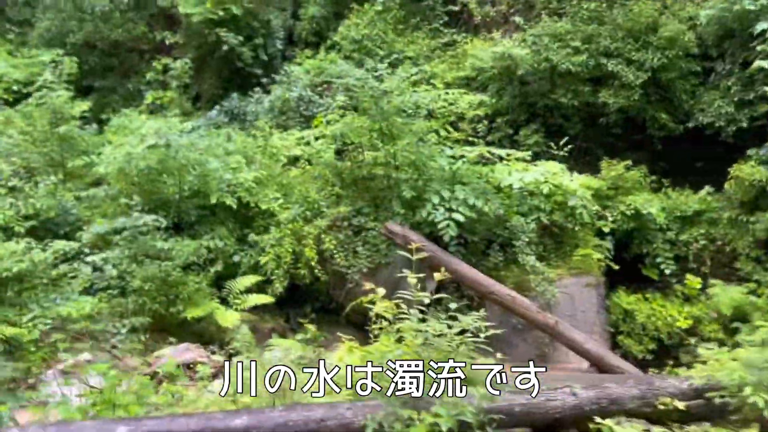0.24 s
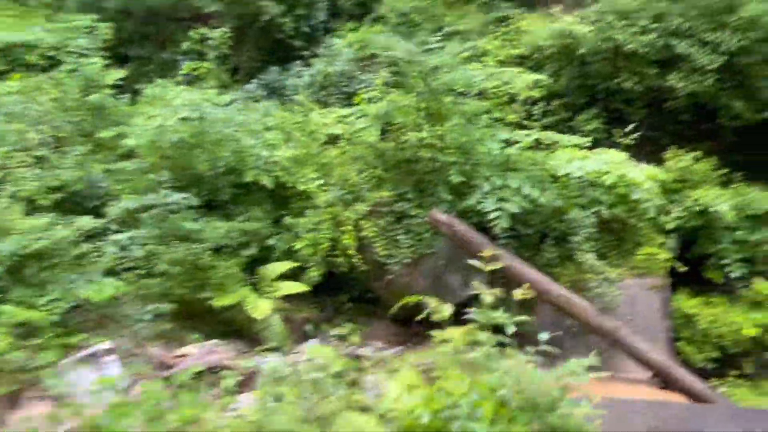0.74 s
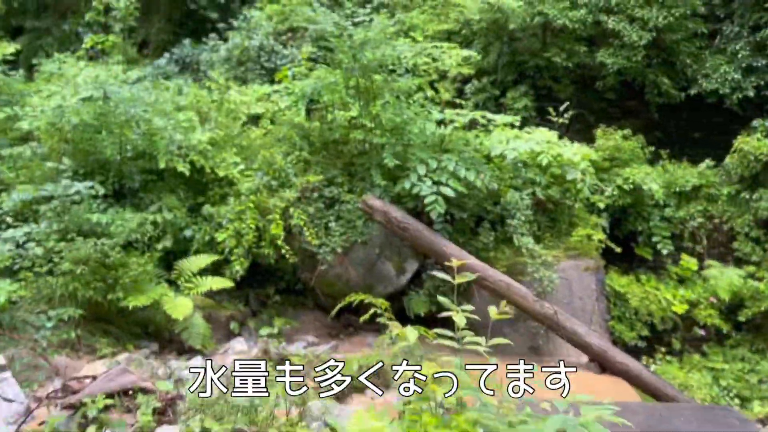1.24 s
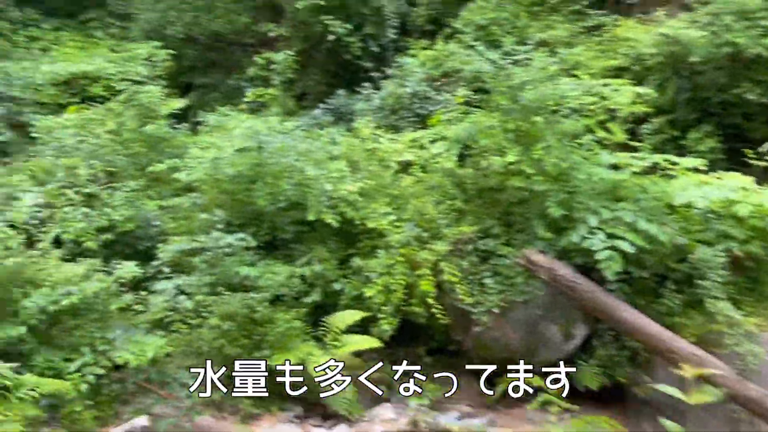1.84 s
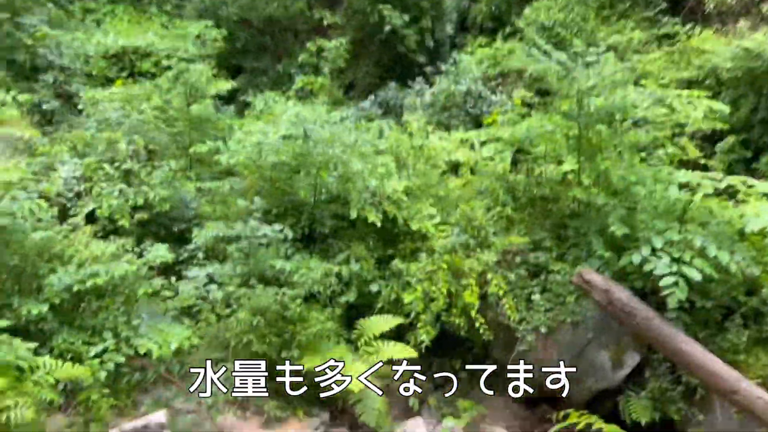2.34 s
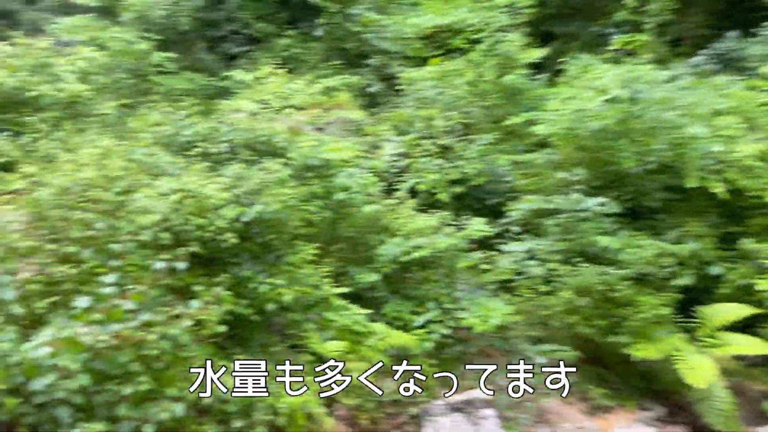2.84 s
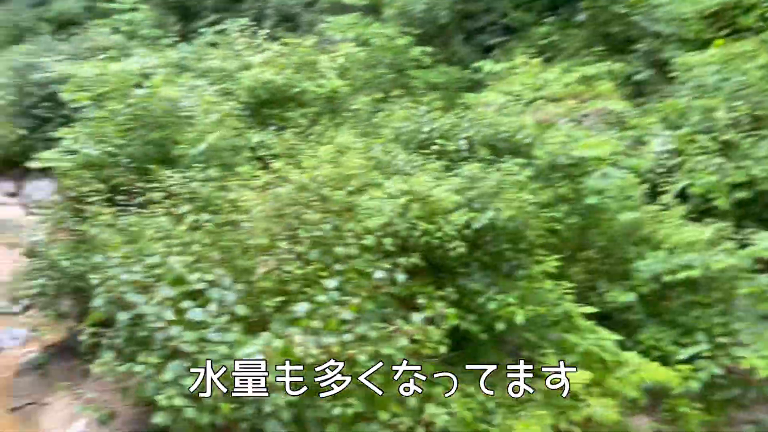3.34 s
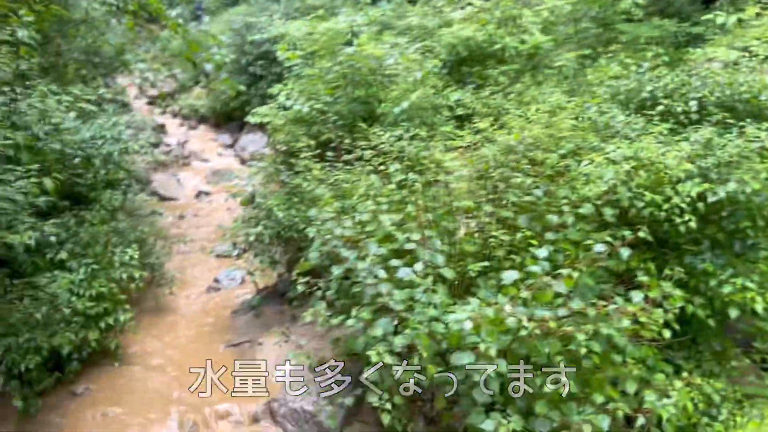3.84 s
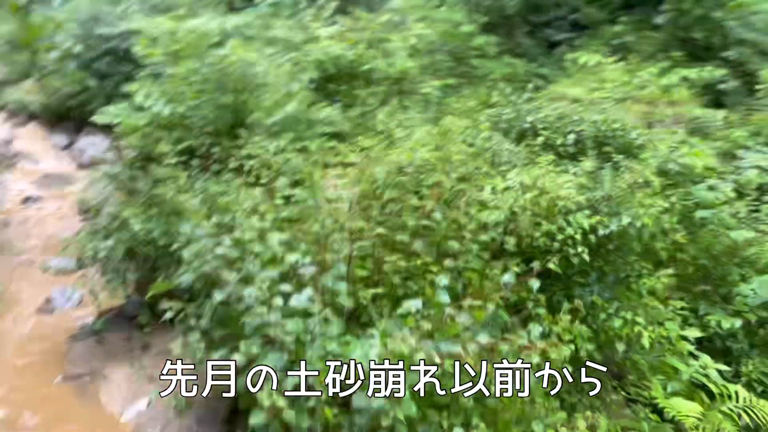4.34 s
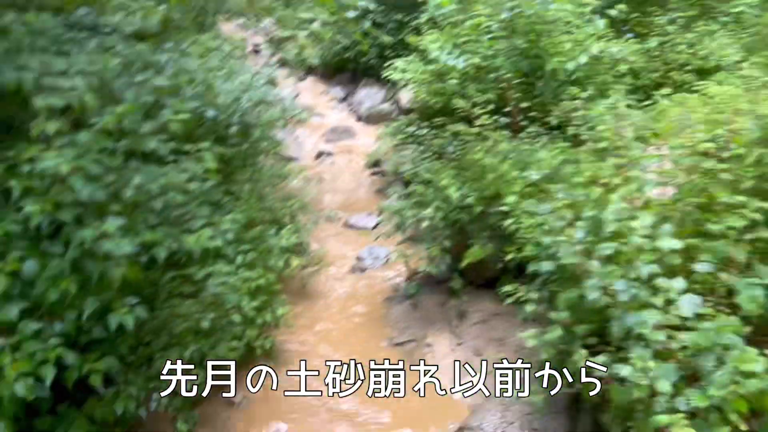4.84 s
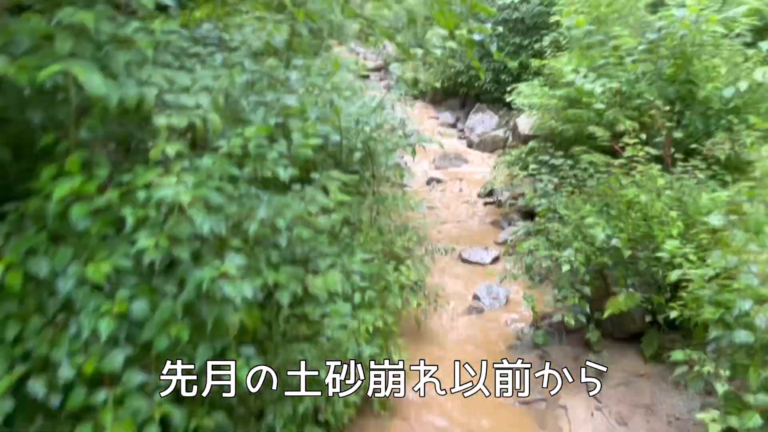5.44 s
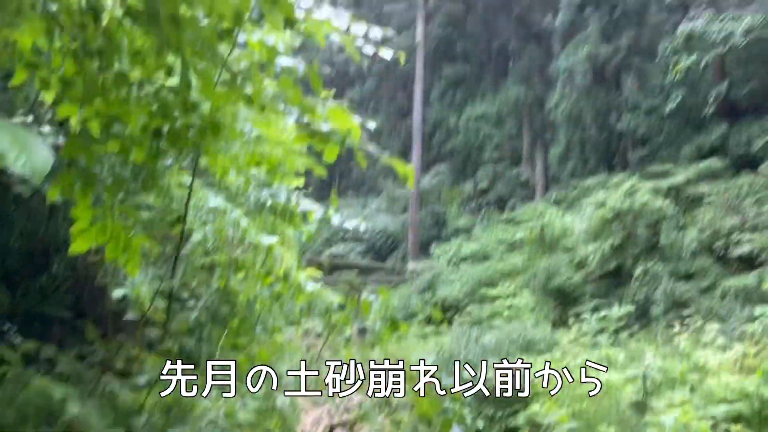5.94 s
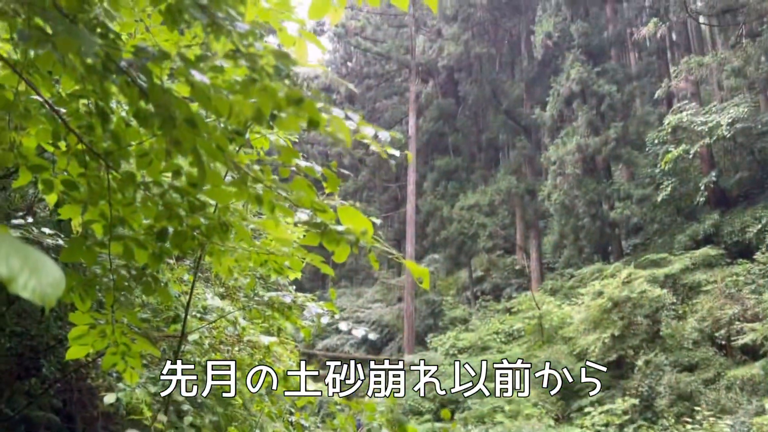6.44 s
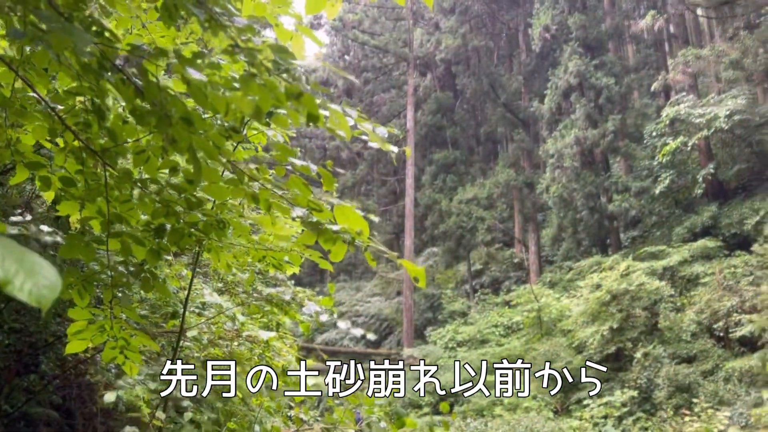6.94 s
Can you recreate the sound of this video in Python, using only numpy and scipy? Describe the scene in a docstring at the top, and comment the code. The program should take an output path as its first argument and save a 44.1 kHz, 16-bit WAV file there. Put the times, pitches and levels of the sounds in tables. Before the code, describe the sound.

A swollen stream rushes steadily over rocks in a wooded valley, with roar, babble and hiss, scattered plops, spatters and soft handling bumps.

```python
"""A swollen stream rushes over rocks in a wooded valley, heard from the bank on a hand-held stereo recorder.
Throughout, noise bands mixed with ringing bubbles make roar, babble and hiss, coloured by moving resonances.
The recorder turns from the wooded bank towards the stream. From half a second on, soft bumps (gliding thumps),
spatters (noise bursts) and plops (rising sines) come singly; at 1.8 s a small bird chips once (a sagging sine).
From 5.2 s the recorder tilts up to the trees, which rebalances the parts of the water."""
import sys
import numpy as np
from scipy import signal
from scipy.io import wavfile

SR = 44100
rng = np.random.default_rng(int(sys.argv[2]) if len(sys.argv) > 2 else 0)


def wav_out(sig):
    """Save sig, one row per channel (or a flat mono array), as 16-bit PCM at SR to the path in sys.argv[1]."""
    wavfile.write(sys.argv[1], SR, np.round(np.clip(np.atleast_2d(sig).T, -1, 1) * 32767).astype(np.int16))


N = 317368


def from_db(db):
    """Decibels to amplitude gain."""
    return 10 ** (np.asarray(db) / 20)


def rms_one(x):
    """Scale to unit rms."""
    return x / np.sqrt(np.mean(x ** 2) + 1e-20)


def read(rows, at):
    """Each column of a table, interpolated linearly over the first one."""
    first, *columns = np.transpose(rows)
    return [np.interp(at, first, column) for column in columns]


def bell(x, half_width):
    """Gaussian hump of height one around zero, down to 1/e at the half-width."""
    return np.exp(-(x / half_width) ** 2)


def drift(corner_hz):
    """Slow random curve of unit rms: noise through a two-pole low-pass at 1/40 of the sample rate."""
    step, settle = 40, 2000
    pole = np.exp(-2 * np.pi * corner_hz * step / SR)
    white = rng.standard_normal(N // step + settle + 2)
    slow = signal.lfilter([1], [1, -2 * pole, pole ** 2], white)[settle:]
    return np.interp(np.arange(N) / step, np.arange(len(slow)), rms_one(slow))


def band(x, low_hz, high_hz):
    """Gentle band-pass."""
    sos = signal.butter(2, [low_hz, min(high_hz, .45 * SR)], "band", fs=SR, output="sos")
    return signal.sosfilt(sos, x)


def ring(clicks, hz, t60_s):
    """Two-pole resonator: each click starts a decaying sine."""
    pole, w = from_db(-60 / (t60_s * SR)), 2 * np.pi * hz / SR
    return signal.lfilter([0, np.sin(w)], [1, -2 * pole * np.cos(w), pole ** 2], clicks + 1e-18)


def dying(t60_s):
    """Time axis and exponential envelope of one decay by 60 dB."""
    t = np.arange(int(t60_s * SR)) / SR
    return t, np.exp(-np.log(1000) * t / t60_s)


def add(out, start_s, sound):
    """Mix a sound in at its start time."""
    start = int(start_s * SR)
    out[start:start + len(sound)] += sound[:N - start]


def placed(x, pan_db):
    """Lean a sound to the left (+) or right (-) by a level difference."""
    return x * from_db([[pan_db / 2], [-pan_db / 2]])


def view(s):
    """Swing of the exposure about its mean (dB) and upward tilt (0-1) at times s."""
    # How openly the water is heard past the bushes. Each row: time in s, splash level in dB.
    exposure = [(0.0, -42.5), (0.52, -42.5), (1.55, -41), (2.1, -39), (2.7, -38), (3.25, -36.5),
                (3.8, -38.5), (4.3, -38), (5.13, -38), (6.3, -38), (7.2, -39.5)]
    tilt_start_s, tilt_length_s = 5.18, 1
    db = read(exposure, s)[0]
    return db - db.mean(), np.clip((s - tilt_start_s) / tilt_length_s, 0, 1)


def heard_db(part, swing_db, tilt):
    """A part of the water grows as the bushes clear and changes as the recorder tilts up."""
    level_db, share, tilted_db = part
    return level_db + share * swing_db + tilted_db * tilt


def bursts(per_s, fade_s):
    """Random slaps of water: each jumps up and decays; zero mean, unit rms."""
    slaps = (rng.random(N) < per_s / SR) * np.minimum(rng.exponential(1, N), 2)
    level = signal.lfilter([1], [1, -np.exp(-1 / (fade_s * SR))], slaps)
    return rms_one(level - level.mean())


def churn(edges_hz, surge_db, patchy_db, per_s, cycles, size_db, bubble_db):
    """Two views of churning water, flat per Hz: far bubbles merge into noise, near ones ring singly."""
    smallest_draw = .025   # this share of the bubbles has the full size
    pitches_per_band = 6
    white = rng.standard_normal((2, 2, N))
    born = np.flatnonzero(rng.random(N) < per_s / SR)
    size, bearing, pitch = rng.random((len(born), 3)).T
    # small bubbles are common, large ones rare; each has its own direction
    strength = from_db(-size_db * np.log(np.maximum(size, smallest_draw)))
    kicks = strength * [np.cos(2 * np.pi * bearing), np.sin(2 * np.pi * bearing)]
    pitch_index = (pitch * pitches_per_band * (len(edges_hz) - 1)).astype(int)
    out = np.zeros((2, N))
    for k, (low_hz, high_hz) in enumerate(zip(edges_hz, edges_hz[1:])):
        near = np.zeros((2, N))
        for j in range(pitches_per_band):
            hz = low_hz * (high_hz / low_hz) ** ((j + .5) / pitches_per_band)
            clicks = np.zeros((2, N))
            clicks[:, born] = kicks * (pitch_index == k * pitches_per_band + j)
            near += ring(clicks, hz, cycles / hz)
        far = rms_one(band(white[k % 2], low_hz, high_hz))
        both = far + from_db(bubble_db) * rms_one(near)
        level_db = surge_db + patchy_db * drift(corner_hz=14.0)
        out += np.sqrt(high_hz - low_hz) * rms_one(both * from_db(level_db))
    return out


def stream():
    """Air pockets roar under the falls, bubbles babble between the rocks, spray splashes and fizzes."""
    # Each part: level in dB, share of the exposure's swing, change when tilted up in dB.
    rumble_level, roar_level, babble_level = (0.6, 0, -0.86), (1.36, 0.076, -4), (0.43, 0.51, 0.62)
    splash_level, fizz_level = (-0.11, 1, -0.48), (1, 0.39, -2.6)
    slaps_follow = .9   # share of the exposure's swing; behind the bushes slaps blur into smooth hiss
    swing_db, tilt = view(np.arange(N) / SR)
    surge = drift(corner_hz=12.0)
    slaps = from_db(slaps_follow * swing_db) * bursts(per_s=120, fade_s=0.004)
    rumble = churn(np.geomspace(30, 120, 4), .15 * surge,
                   patchy_db=0.6, per_s=60, cycles=4.3, size_db=7.0, bubble_db=-14)
    roar = churn(np.geomspace(120, 500, 6), 0.07 * surge,
                 patchy_db=1.16, per_s=340, cycles=29, size_db=2.0, bubble_db=-5.5)
    babble = churn(np.geomspace(500, 1700, 7), 0.47 * surge + 0.21 * slaps,
                   patchy_db=0.98, per_s=950, cycles=64, size_db=2.5, bubble_db=-3.0)
    splash = churn(np.geomspace(1700, 6000, 8), 0.33 * surge + 0.46 * slaps,
                   patchy_db=1.31, per_s=1300, cycles=68, size_db=2.5, bubble_db=-4)
    fizz = churn(np.geomspace(6000, 16000, 5), 0.03 * surge + 0.5 * slaps,
                 patchy_db=1.2, per_s=2000, cycles=30, size_db=3.5, bubble_db=-6.5)
    levels = (rumble_level, roar_level, babble_level, splash_level, fizz_level)
    parts = (rumble, roar, babble, splash, fizz)
    return sum(from_db(heard_db(level, swing_db, tilt)) * part for level, part in zip(levels, parts))


def rock_bed(hz, s):
    """Gain of the water's colour: the plunge pool booms low, the gurgle wanders, brief swells come and go."""
    # Colour of the rushing water. Each row: frequency in Hz, density in dB per Hz.
    water = [(25, -91), (65, -69), (150, -66.5), (260, -65.5), (345, -66.5), (450, -65.5), (520, -67),
             (630, -69.5), (850, -67), (1050, -68), (1550, -69.5), (1850, -72), (3200, -73.5),
             (5000, -75.5), (9000, -84), (13000, -83.5), (15000, -86.5)]
    # Plunge pool: boost in dB, share of the exposure's swing, change when tilted up in dB.
    pool_boost = (5.66, .33, -5.5)
    # Gurgle between the rocks. Each row: time in s, pitch in Hz, boost in dB.
    gurgle_path = [(0, 900, -2.5), (1.5, 850, 1.1), (2.5, 1000, 1.5), (3.1, 1130, 3.2), (3.9, 1050, 3.5),
                   (4.35, 1450, 5.5), (4.65, 1200, 3.5), (5.2, 1200, 1.5), (7.2, 1300, -1)]
    # Passing swells in the water's colour, each around one pitch.
    # Each row: middle in s, half-length in s, boost in dB, pitch in Hz, half-width in octaves.
    swell_rows = [(.28, 0.14, 11, 108, .25), (1.407, 0.12, 3.5, 2600, 0.71), (1.47, 0.19, 6.5, 152, 0.4),
                  (2.14, 0.1, 10, 106, 0.21), (2.35, 0.58, 9.5, 185, 0.15), (3.29, 0.044, 5, 255, .2),
                  (4.4, 0.17, 2, 130, .5), (4.5, .4, 2, 5200, 0.3), (4.55, 0.39, 1.5, 540, 0.2),
                  (5.45, 0.94, 4.5, 670, 0.2), (5.45, 0.56, 2.5, 3120, 0.3), (5.6, 0.055, 3.5, 1700, .45),
                  (5.864, 0.048, 5, 1400, 0.6), (6.3, 0.14, 1.7, 1900, .6), (6.983, 0.34, 5.5, 1620, 0.66)]
    pool_hz, pool_octaves, gurgle_octaves = 258, 0.18, 0.36
    octave = np.log2(hz + 1)[:, None]
    swing_db, tilt = view(s)
    water_hz, water_db = np.transpose(water)
    plain = np.interp(octave, np.log2(water_hz), water_db)
    pool = heard_db(pool_boost, swing_db, tilt) * bell(octave - np.log2(pool_hz), pool_octaves)
    gurgle_hz, gurgle_db = read(gurgle_path, s)
    gurgle = gurgle_db * bell(octave - np.log2(gurgle_hz), gurgle_octaves)
    swells = sum(db * bell(s - middle_s, half_s) * bell(octave - np.log2(pitch_hz), octaves)
                 for middle_s, half_s, db, pitch_hz, octaves in swell_rows)
    return from_db(plain + pool + gurgle + swells)


def microphones(views):
    """Water at two spaced ports: likeness, phase lead and level lean depend on frequency and on the turn."""
    # Each row: frequency in Hz, likeness 0-1, left lead in rad, left-right level in dB.
    facing_bank, facing_stream = [(35, .65, -0.5, 8), (100, 0.82, 0, -1.2), (284, 0.9, 0, 2),
                                  (596, 0, -1.66, 1.7), (1000, 0, 1.2, 0), (1550, 0.03, 1.5, -2.5),
                                  (1770, 0.47, 2.04, 1), (2900, 0.12, 0.4, 0), (3900, 0.05, -0.05, 1.5),
                                  (4970, 0.47, 1, 2), (5400, 0, -2.5, -1.5), (7000, 0.46, 0.5, -1)], [(35, 1, -0.5, 1), (100, 0.86, 0, 0),
                                                       (278, 0.73, 0.1, -0.5), (523, 0.38, -1.8, -2.5),
                                                       (1000, 0.24, -1.9, -6), (1550, 0.14, -1.8, -2),
                                                       (1740, 0.31, 0.5, 3), (3000, 0.5, 1.2, -1),
                                                       (3870, 0.49, -0.2, 3), (4900, 0.13, 0.9, 3.5),
                                                       (5370, 0.21, -2.5, 1.5), (7240, 0.83, 0.8, -.1)]
    treble_bearing = [(8500, .65, -1.4, 0), (9800, .99, -3.1, 0), (12800, .95, -6.3, 0),
                      (15000, .6, -8.3, 0)]   # same columns; shared by both facings
    # Swing of the recorder. Each row: time in s, position (0 bank, 1 stream).
    turn_path = [(0, 0), (2.6, 0.26), (3.5, .65), (4.4, 0.55), (5.2, 1.2), (7.2, 0.86)]
    size = 2048
    hz, s, (common, apart) = signal.stft(views, SR, nperseg=size)
    turn = read(turn_path, s)[0]
    bank = read(np.vstack([facing_bank, treble_bearing]), hz)
    water = read(np.vstack([facing_stream, treble_bearing]), hz)
    alike, lead_rad, pan_db = (a[:, None] + turn * (b - a)[:, None] for a, b in zip(bank, water))
    alike = np.clip(alike, 0, .99)
    mid, side = np.sqrt(1 + alike) * common, np.sqrt(1 - alike) * apart
    lean = from_db(pan_db / 2) * np.exp(.5j * lead_rad)
    pair = np.array([(mid + side) * lean, (mid - side) / lean])
    pair = pair / np.hypot(abs(lean), 1 / abs(lean))
    return signal.istft(rock_bed(hz, s) * pair, SR, nperseg=size)[1][:, :N]


def bumps():
    """Knocks on the recorder: each thump's period grows linearly; the higher it starts, the stronger its tick."""
    # Each row: start in s, level in dB, starting pitch in Hz, t60 in s, growth of the period in s per s.
    knocks = [(0.513, -32, 100, 0.35, 0.22), (0.597, -34, 75, .2, .15), (0.730, -42, 85, .16, 0.32),
              (2.973, -31, 125, .16, 0.27), (3.170, -31, 150, 0.18, .33), (3.215, -25, 105, 0.18, 0.26),
              (4.294, -23.5, 165, 0.11, .36), (4.499, -26, 140, 0.11, .4), (4.5248, -25, 170, 0.037, 0.67),
              (5.314, -29, 100, 0.12, .3), (5.470, -35, 95, 0.17, .3), (6.713, -24, 230, .04, 0.39),
              (6.9655, -24, 520, 0.07, 0.78)]
    equal_tick_hz = 650   # starting pitch at which the tick's factor is one
    tick_cycles = 0.12   # half-width
    out = np.zeros(N)
    for start_s, db, hz, t60_s, stretch in knocks:
        t, fade = dying(t60_s)
        pitch_hz = 1 / (1 / hz + stretch * t)
        tick = hz / equal_tick_hz * bell(t * hz - 2 * tick_cycles, tick_cycles)
        phase = 2 * np.pi * np.cumsum(pitch_hz) / SR
        thump = fade * (1 - np.exp(-t * hz)) * np.sin(phase)
        add(out, start_s, from_db(db) * (2 * tick + thump))
    return out


def spatters(spread):
    """Thrown water lands on the rocks as a short decaying burst of band-passed noise."""
    # Each row: start in s, level in dB, centre in Hz, t60 in s.
    landings = [(0.738, -31, 3300, .012), (1.637, -35.5, 1100, 0.11), (3.127, -23.5, 3200, .016),
                (3.304, -33, 6300, .008), (4.433, -30, 6300, .008), (4.446, -32, 2700, .008),
                (4.722, -24, 3000, 0.014), (4.99, -32, 6500, 0.016), (5.0, -29, 4600, 0.013),
                (5.303, -32, 3300, .018), (5.33, -30, 3200, .012), (5.619, -34, 2700, 0.0092),
                (5.871, -36, 1250, 0.12), (6.268, -28, 6100, 0.01), (6.729, -29, 5500, .01),
                (7.026, -36, 5200, .025)]
    out = np.zeros(N)
    for start_s, db, hz, t60_s in landings:
        t, fade = dying(t60_s)
        hiss = rms_one(band(rng.standard_normal(SR), hz / (1 + spread), hz * (1 + spread)))
        add(out, start_s, from_db(db) * fade * hiss[:len(t)])
    return out


def plops(swell_s):
    """A bubble rings briefly and rises in pitch as it nears the surface; most reach the left port later."""
    # Each row: start in s, level in dB, pitch in Hz, t60 in s, rise in octaves per s,
    # left-right level in dB, delay at the left port in s.
    bubbles = [(1.665, -26, 1440, .02, 8, -1, .0002), (2.800, -25, 3640, .01, 10, 5, 0.0023),
               (4.086, -27, 2560, .012, 10, 10, 0.0033), (4.218, -20, 3400, 0.015, 35, -1, 0.0015),
               (4.270, -23.5, 2660, .012, 25, -9, 0), (4.478, -28, 3450, .018, 5, 3, 0.0034),
               (5.030, -26, 1250, 0.024, 8, -4, .0002), (5.187, -23.5, 4600, 0.011, 12, -2, 0),
               (5.239, -24, 1550, 0.031, 8, 0, .0001), (5.3, -22, 3800, 0.0093, 10, -1, 0),
               (5.592, -25.5, 1910, .018, 8, 0, 0), (5.620, -24, 1770, .018, 8, 4, 0.0011),
               (5.628, -25, 1440, .025, 8, 0, .0001), (5.773, -24, 1150, .02, 8, 0, .0001),
               (5.854, -22.5, 1580, .02, 12, -2, .0001), (5.879, -27, 830, 0.03, 6.4, -2, .0002),
               (5.911, -27, 1360, .03, 8, -2, .0001), (6.037, -26, 1050, .035, 8, -7, 0.0026),
               (6.135, -26, 1110, .024, 12, -8, .0002), (6.161, -24, 1030, .016, 12, -9, .0002),
               (6.254, -30, 1500, .02, 8, -4, .0002), (6.422, -24, 1410, .022, 8, -5, 0.0018),
               (6.824, -27, 1520, .02, 8, -2, .0002), (6.9206, -14, 1320, 0.03, 65, -4, .00017),
               (7.108, -25, 1320, 0.032, 15, -6.5, .0002), (7.151, -21, 1325, 0.037, 5, 1, 0.0019),
               (7.164, -27, 1480, .022, 8, -3, .0002)]
    max_rise_octaves = 0.46
    left, right = np.zeros((2, N))
    for start_s, db, hz, t60_s, rise, pan_db, lag_s in bubbles:
        t, fade = dying(t60_s)
        pitch_hz = hz * 2 ** np.minimum(rise * t, max_rise_octaves)
        phase = 2 * np.pi * np.cumsum(pitch_hz) / SR
        swell = 1 - np.exp(-t / swell_s)
        plop = placed(from_db(db) * fade * swell * np.sin(phase), pan_db)
        add(left, start_s + lag_s, plop[0])
        add(right, start_s, plop[1])
    return np.array([left, right])


def bird():
    """One thin pure chip that swells, sags in pitch and fades, with a faint echo from the trees."""
    # Each row: start in s, length in s, starting pitch in Hz, level in dB.
    chips = [(1.779, .05, 5055, -39.5)]
    sag_hz_per_s, echo_s, echo_db = 1000, .045, -11
    out = np.zeros(N)
    for start_s, length_s, hz, db in chips:
        t = np.arange(0, length_s, 1 / SR)
        phase = 2 * np.pi * np.cumsum(hz - sag_hz_per_s * t) / SR
        chip = from_db(db) * np.sin(np.pi * t / length_s) * np.sin(phase)
        add(out, start_s, chip)
        add(out, start_s + echo_s, from_db(echo_db) * chip)
    return out


def scene():
    """The wide rush of the stream with the small single sounds on top."""
    near = plops(swell_s=0.00033) + placed(spatters(spread=0.27), pan_db=-1.0)
    return microphones(stream()) + near + placed(bumps(), pan_db=3.5) + placed(bird(), pan_db=-7)


def record(dry):
    """The recorder cuts the deepest bass and the top."""
    low_cut_hz, high_cut_hz = 30, 15200
    thinned = signal.sosfilt(signal.butter(4, low_cut_hz, "high", fs=SR, output="sos"), dry)
    return signal.sosfilt(signal.ellip(10, .2, 80, high_cut_hz, fs=SR, output="sos"), thinned)


dry = scene()
out = record(dry)
wav_out(out)
```